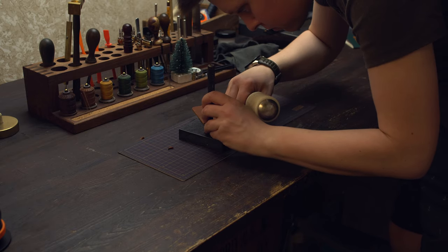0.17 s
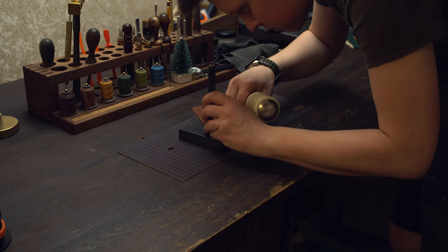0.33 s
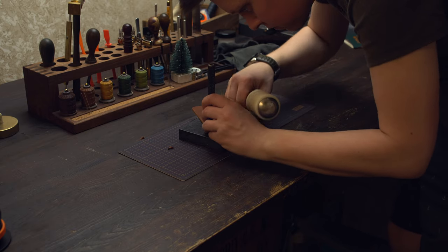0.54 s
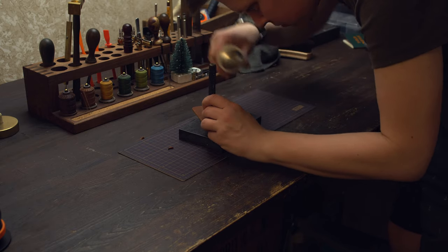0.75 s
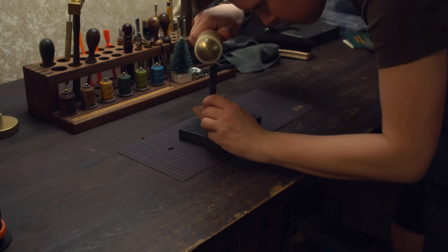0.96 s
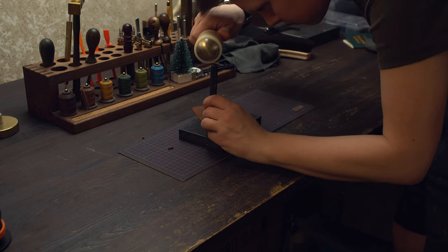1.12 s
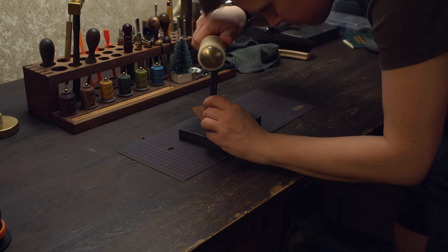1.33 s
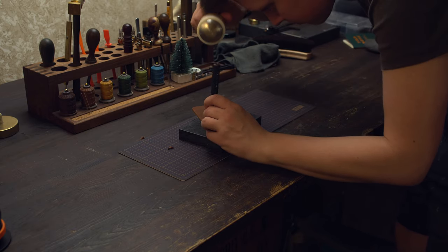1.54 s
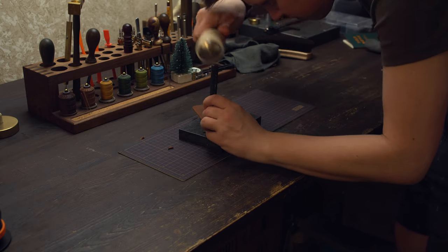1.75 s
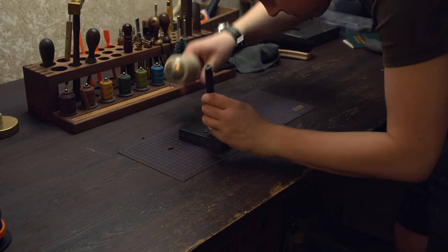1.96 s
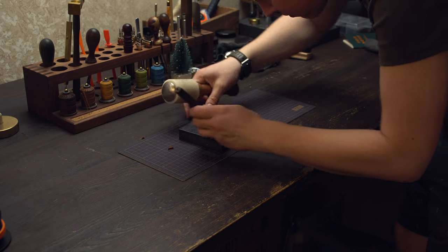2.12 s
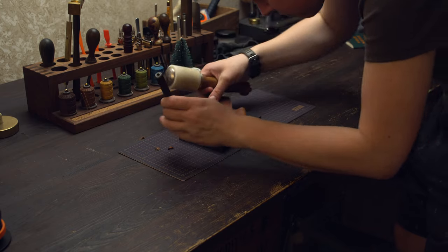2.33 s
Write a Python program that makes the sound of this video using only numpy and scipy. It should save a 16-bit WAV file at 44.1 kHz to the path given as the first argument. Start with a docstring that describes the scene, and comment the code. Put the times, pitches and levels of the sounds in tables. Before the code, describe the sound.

A mallet strikes a steel punch on leather in a small, quiet workshop. Faint handling comes around 0.5 seconds, then a light, dull tap at 1.4 seconds. At 1.7 seconds one hard blow cracks loudly, briefly overloading the microphone, with a workbench thud and short echo. Loose things ring and fade within a second, while faint hand rustles, a high shimmer and a tiny knock follow from 2 to 2.4 seconds.

```python
"""Over quiet room air, tools knock lightly in the hands and leather rustles. A mallet taps a steel
punch once to seat it in leather on a hard block: the punch clacks, the workbench thuds and a small
workshop echoes. One hard blow then drives the punch home, bright enough to crack and loud enough to
overload the microphone. Loose things ring on; the hands rustle again, with a faint high shimmer
from the punch."""
import sys
import numpy as np
from scipy import signal
from scipy.fft import rfft, irfft, next_fast_len
from scipy.io import wavfile

SR = 44100
rng = np.random.default_rng(int(sys.argv[2]) if len(sys.argv) > 2 else 0)


def unload_audio(sound):
    """Save the sound as a 16-bit wav file, at the path given as the first command line argument."""
    columns = np.transpose(np.atleast_2d(sound))
    # keep every value between -1 and 1, then stretch to whole-number steps
    steps = np.round(np.clip(columns, -1, 1) * 32767)
    wavfile.write(sys.argv[1], SR, steps.astype(np.int16))


N = 109809


def undb(db):
    """Amplitude ratio: tenfold for every 20 dB."""
    return 10 ** (np.asarray(db) / 20)


def noise(colour):
    """Random phases under a spectral envelope sum to noise, here of unit rms."""
    hz, db = np.array(colour)[:, :2].T
    f = np.maximum(np.arange(N // 2 + 1) * SR / N, 1)
    magnitude = undb(np.interp(np.log(f), np.log(hz), db))
    y = irfft(magnitude * np.exp(2j * np.pi * rng.random(len(f))), N)
    return y / y.std()


def fade(t, t60_s):
    """Exponential decay from t = 0."""
    return (t >= 0) * np.exp(-np.log(1000) * np.maximum(t, 0) / t60_s)


def rise(t, rise_s):
    """Smooth onset from t = 0."""
    return 1 - np.exp(-(np.maximum(t, 0) / rise_s) ** 2)


def ring(t, modes):
    """Free vibration is a sum of damped sinusoids."""
    return sum(undb(db) * np.sin(2 * np.pi * hz * t) * fade(t, t60) for hz, db, t60 in modes)


# room air spectrum: frequency_hz, relative_db
AIR_SPECTRUM = [(20, -5), (45, -5.5), (76, -21.5), (130, -21.5), (178, -15.5), (215, -25), (340, -19.5),
                (430, -24.5), (630, -18), (860, -25), (1350, -29.5), (2300, -39.5), (5000, -44.5),
                (12500, -47), (16000, -65.5)]
def room_air():
    """Stationary noise, strongest in the bass, sets the noise floor."""
    return undb(-65.5) * noise(AIR_SPECTRUM)


# knocks of tools in the hands: start_s, level_db
KNOCKS = [(.523, -69.5), (1.479, -62), (1.972, -76), (2.34, -64)]
# their spectrum: frequency_hz, relative_db
KNOCK_SPECTRUM = [(200, 0), (1500, 2), (2800, 4.5), (5000, 1.5), (9000, -4), (11000, -14), (16000, -25)]
def tool_knocks(t):
    """Light impacts excite broadband transients that decay exponentially."""
    return noise(KNOCK_SPECTRUM) * sum(undb(db) * fade(t - at, t60_s=0.2) for at, db in KNOCKS)


# rubs of hands and leather, plus a faint high punch shimmer at 2.14 s: peak_s, half_length_s, level_db
SWELLS = [(0.609, 0.038, -71.5), (0.812, 0.11, -77.5), (1.38, 0.012, -58), (1.476, 0.062, -75),
          (2.028, 0.033, -73), (2.14, 0.11, -76.5), (2.273, 0.036, -65), (2.437, 0.124, -71.5)]
# their spectrum: frequency_hz, relative_db
SWELL_SPECTRUM = [(150, 3), (700, -4), (1500, -1), (2800, -5), (5000, -6), (7000, -7), (8700, -2),
                  (10500, -15), (13500, -8), (16000, -23)]
def rubs_and_shimmer(t, grain_db=2, grains_per_s=300):
    """Friction and the punch's shimmer sound as noise swells; random modulation gives the grain."""
    envelope = sum(undb(db) * np.exp(-((t - at) / half) ** 2) for at, half, db in SWELLS)
    swells = noise(SWELL_SPECTRUM) * envelope
    grain = np.interp(t * grains_per_s, np.arange(N), rng.standard_normal(N))
    return swells * undb(grain_db * grain)


def punch_clack(t, low_db, high_db, t60_s, low_hz=949, high_hz=1366):
    """Impact excites two heavily damped modes of the hand-held punch."""
    return ring(t, [(low_hz, low_db, t60_s), (high_hz, high_db, t60_s)]) * rise(t, 0.0013)


# contact spectrum: frequency_hz, relative_db
CRACK_SPECTRUM = [(60, -28), (140, -13.5), (300, -4.5), (450, -6), (750, -2.5), (1550, -3), (2200, -11),
                  (3600, -3), (4800, -15.5), (6200, -13), (7500, -24), (9000, -19.5), (11000, -30.5),
                  (16000, -41)]
def contact_crack(t):
    """A brief contact spreads its energy over a wide band."""
    return undb(-6) * noise(CRACK_SPECTRUM) * fade(t, t60_s=0.048) * rise(t, 0.0008)


# modes of the block's thump, the bench top and its heavy frame: pitch_hz, relative_db, t60_s
THUMP_MODES = [(165, -9.5, 0.097), (300, -7, 0.026)]
BENCH_MODES = [(129.8, -2.5, .19), (137.56, -12, .15), (146.3, -25, 0.21), (209.4, -6.5, .25),
               (222.8, -9, .2), (255.7, -16.5, 0.19), (286, -23, 0.085), (318.7, -18, 0.19),
               (391.4, -25, 0.13), (499.3, -22.5, .22)]
FRAME_MODES = [(61, -36.5, 1.1), (77.6, -36, .5), (125, -48, 1.1)]
def bench_thud(t, low_cut_hz=95):
    """The block drives the bench into resonance; the top's deepest bass is cut away, while the frame rumbles
    on."""
    swell = rise(t, 0.017)
    top = ring(t, THUMP_MODES) + ring(t, BENCH_MODES) * swell
    low_cut = signal.butter(2, low_cut_hz, "highpass", fs=SR, output="sos")
    return signal.sosfilt(low_cut, top) + ring(t, FRAME_MODES) * swell


# resonances of room and bench, and of loose things on the bench: pitch_hz, relative_db, t60_s
ROOM_BENCH_MODES = [(751.3, -20, 0.26), (838, -18, 0.21), (810, -17, 0.27), (903, -24, 0.3),
                    (956, -16.5, 0.08), (1020, -6.5, 0.19), (1087, -24, 0.41), (1143, -16.5, 0.17),
                    (1213.4, -11, 0.37), (1263, -17.5, .26), (1351, -13, 0.34), (1423, -14.5, 0.21),
                    (1485, -14.5, 0.29), (1503, -18, .26)]
LOOSE_MODES = [(168, -39, .9), (383, -61, 2.8), (588, -59, 1.8), (975, -47, 1.1), (1132, -45, .8),
               (1228, -34, .7), (1262, -37, .7), (1318, -45, 1.1), (1556, -45, .75), (1970, -53, .9),
               (2063, -53, .8)]
# after-ring of bench and tool rack: frequency_hz, relative_db
AFTER_RING_SPECTRUM = [(25, -6.5), (45, 3), (90, -6.5), (200, -8.5), (400, -20.5), (900, -19), (1280, -9.5),
                       (1700, -21.5), (2500, -27), (5000, -37.5), (12000, -55)]
def sympathetic_ring(t):
    """Resonances of room, bench, rack and loose things ring on after a blow."""
    after_ring = undb(-33) * noise(AFTER_RING_SPECTRUM) * fade(t, t60_s=0.87)
    return (ring(t, ROOM_BENCH_MODES) + ring(t, LOOSE_MODES) + after_ring) * rise(t, 0.01)


# reverberation bands: frequency_hz, relative_db, t60_s
ROOM_BANDS = [(39.57, -27.5, .8), (90, -22.5, .35), (179, -6, .3), (303, -5, .29), (436.8, -16, 0.33),
              (780, -5, .27), (1050, -5.5, 0.3), (1450, -1.5, 0.3), (1890, -12.5, .29), (2908, -12, .3),
              (4200, -21, .3), (6300, -24.5, .275), (8333, -33.5, 0.27), (11495, -45, 0.25),
              (16000, -48.5, .19)]
def workshop_echo(t, delay_s=0.0092):
    """Dense wall reflections merge into reverberation; the treble dies first."""
    hz, _, t60s = np.array(ROOM_BANDS).T
    spectrum = rfft(noise(ROOM_BANDS))
    f = np.maximum(np.arange(len(spectrum)) * SR / N, 1)
    tail = 0
    for share, t60_s in zip(np.eye(len(hz)), t60s):
        band = irfft(spectrum * np.interp(np.log(f), np.log(hz), share), N)
        tail += band * fade(t, t60_s)
    return undb(-6) * tail * rise(t - delay_s, 0.0088)


def mallet_contact(x, cutoff_hz, order=14, leak_db=-17.5):
    """A contact acts as a low-pass filter: the gentler the blow, the lower the cut-off."""
    size = next_fast_len(2 * N)
    f = np.arange(size // 2 + 1) * SR / size
    gain = 1 / np.sqrt(1 + (f / cutoff_hz) ** (2 * order)) + undb(leak_db)
    # minimum phase, so that nothing sounds before the blow
    cepstrum = irfft(np.log(gain), size)
    cepstrum[1:size // 2] *= 2
    cepstrum[size // 2:] = 0
    return irfft(rfft(x, size) * np.exp(rfft(cepstrum)), size)[:N]


# seating tap, then hard blow:
# start_s, bright_gain_db, bench_gain_db, cutoff_hz, clack_low_db, clack_high_db, clack_t60_s
BLOWS = [(1.367, -19.5, -10, 952, -18.5, -30, 0.032), (1.7177, 1, 1, 14890, 2.5, 10.5, .022)]
def mallet_blow(t, bright_gain_db, bench_gain_db, cutoff_hz, *clack_settings):
    """One impact excites clack and thud; contact hardness shapes its crack, ring and echo."""
    clack = punch_clack(t, *clack_settings)
    thud = undb(bench_gain_db) * bench_thud(t)
    bright = contact_crack(t) + sympathetic_ring(t) + workshop_echo(t)
    return clack + thud + undb(bright_gain_db) * mallet_contact(bright, cutoff_hz)


def scene():
    """Superposition: air, handling and two blows add in one channel."""
    t = np.arange(N) / SR
    background = room_air() + tool_knocks(t) + rubs_and_shimmer(t)
    blows = sum(mallet_blow(t - start_s, *settings) for start_s, *settings in BLOWS)
    return (background + blows)[None]


def record(dry, top_hz=15750):
    """Overload clips the peaks at full scale; a low-pass filter then limits the bandwidth."""
    low_pass = signal.ellip(8, .1, 70, top_hz, fs=SR, output="sos")
    return signal.sosfilt(low_pass, np.clip(dry, -1, 1))


dry = scene()
out = record(dry)
unload_audio(out)
```